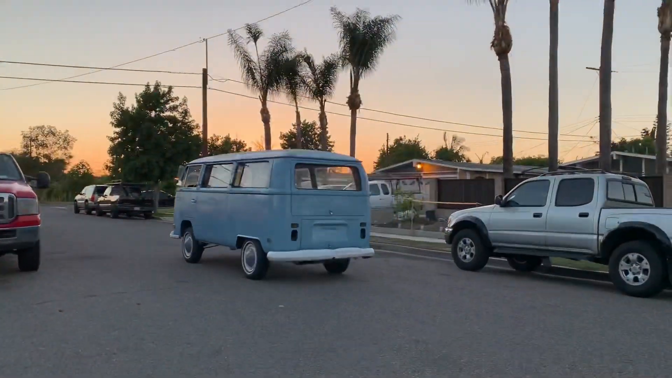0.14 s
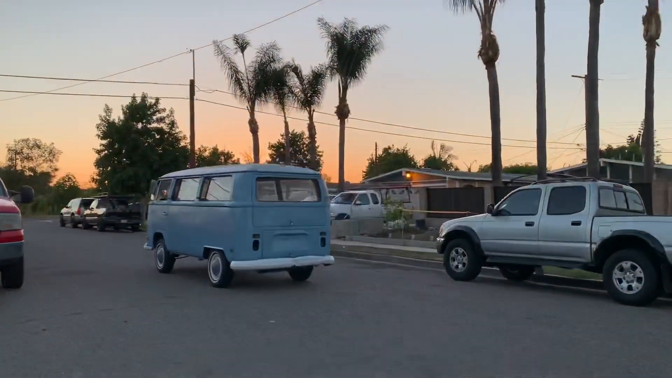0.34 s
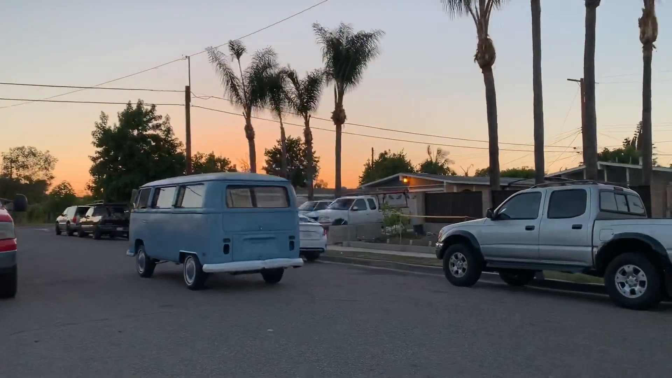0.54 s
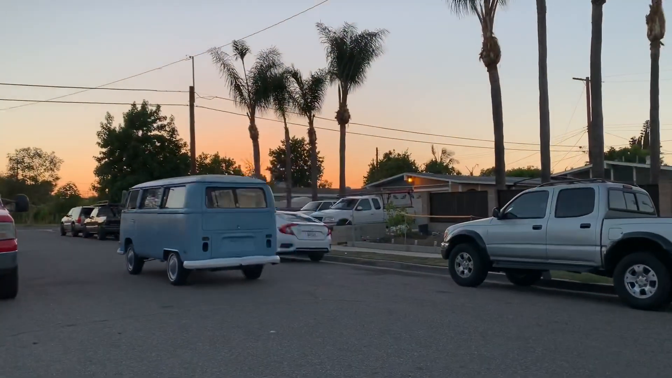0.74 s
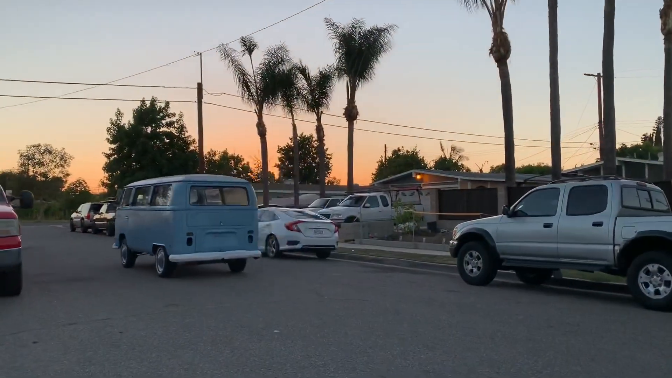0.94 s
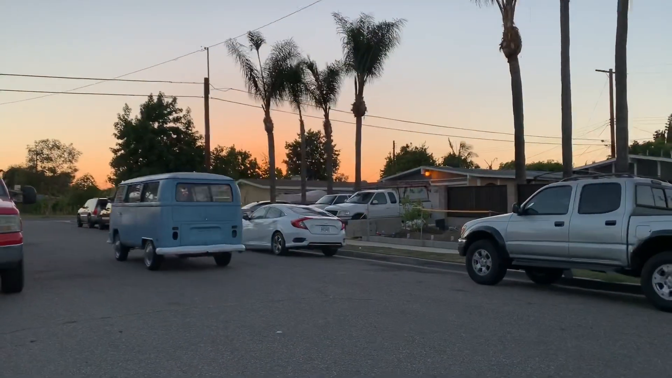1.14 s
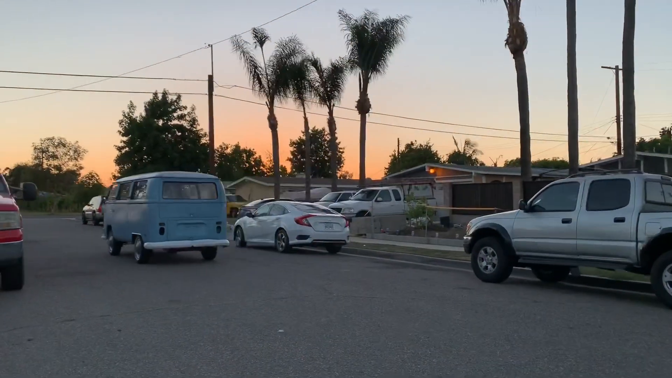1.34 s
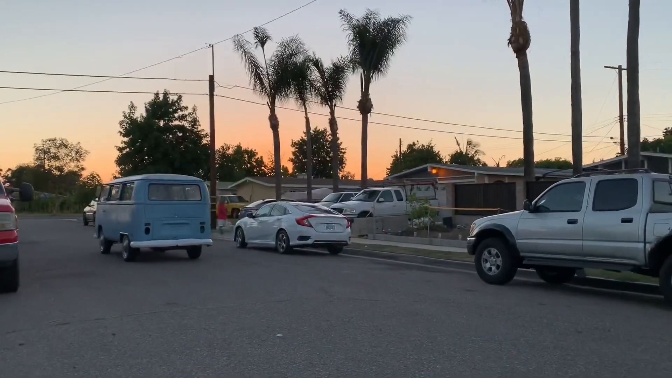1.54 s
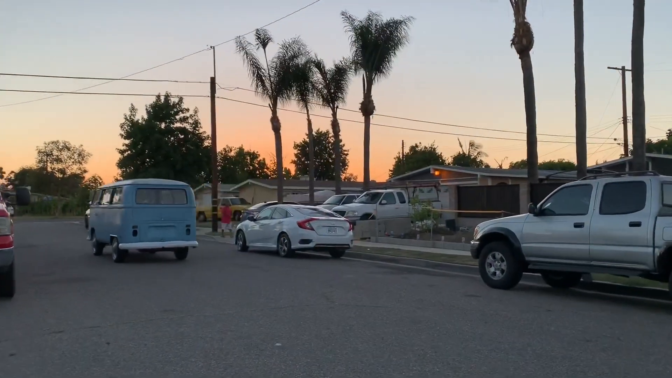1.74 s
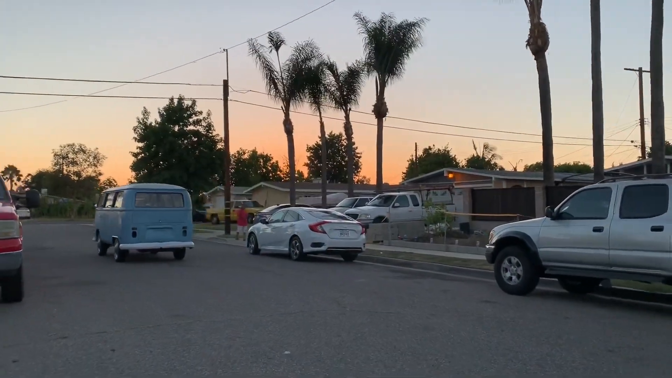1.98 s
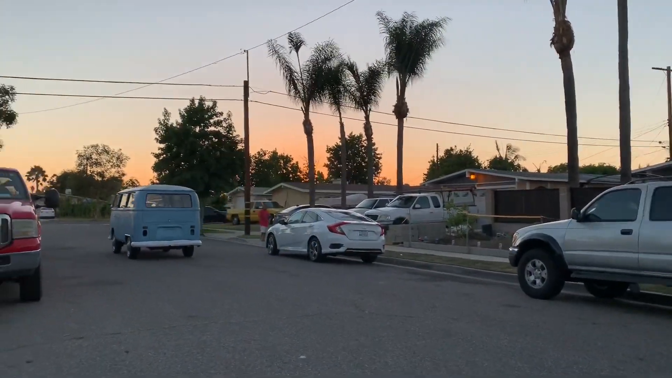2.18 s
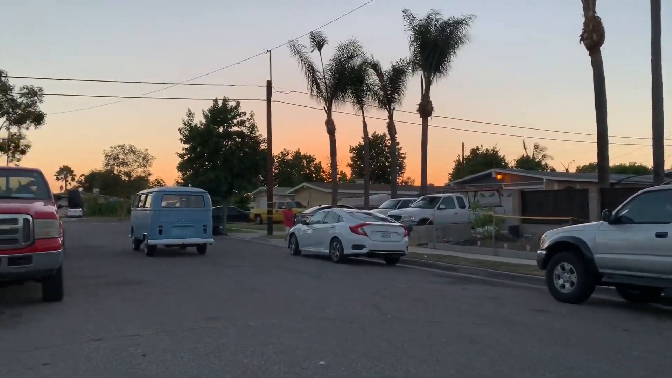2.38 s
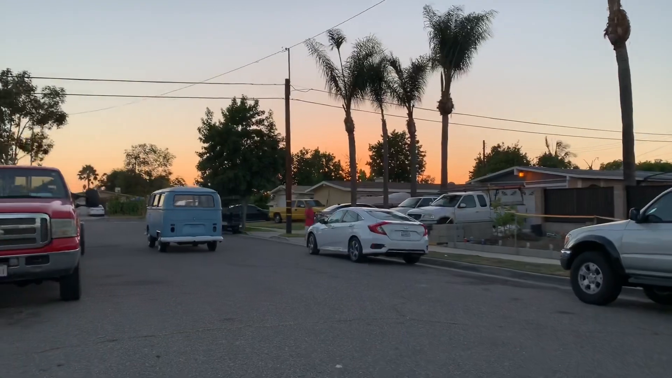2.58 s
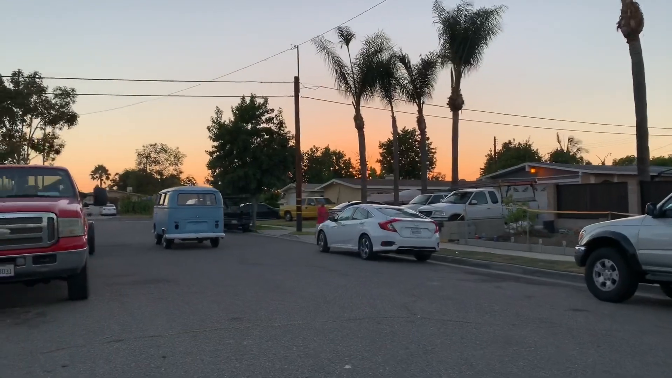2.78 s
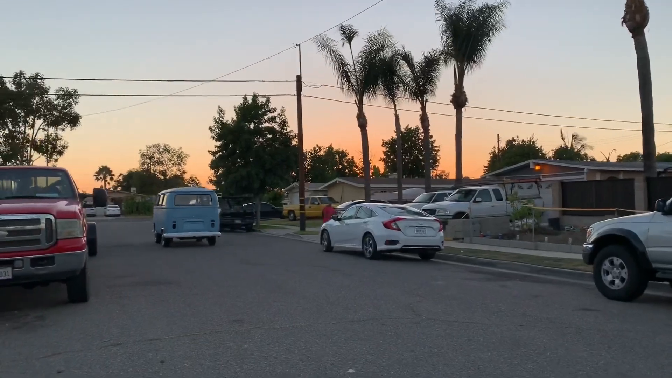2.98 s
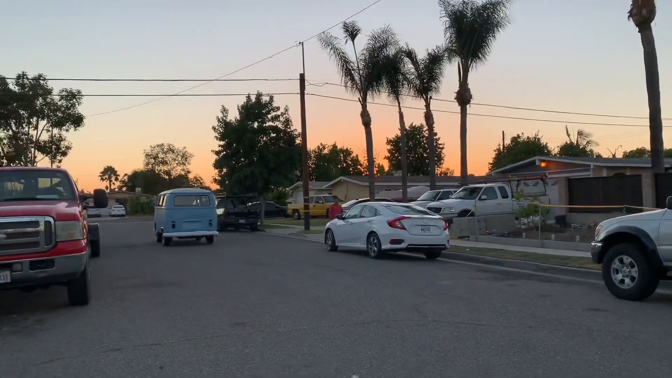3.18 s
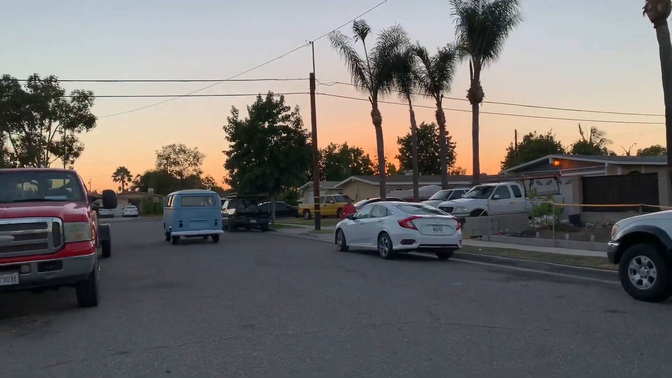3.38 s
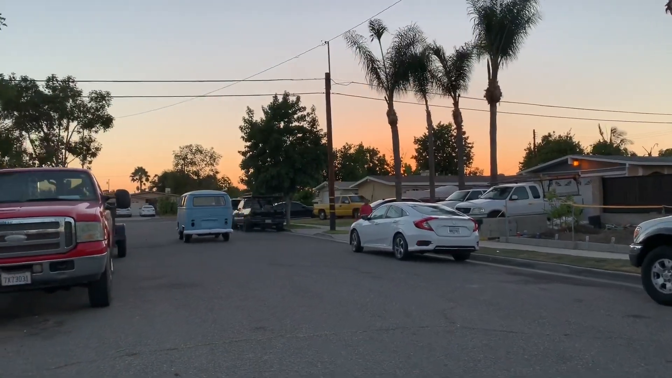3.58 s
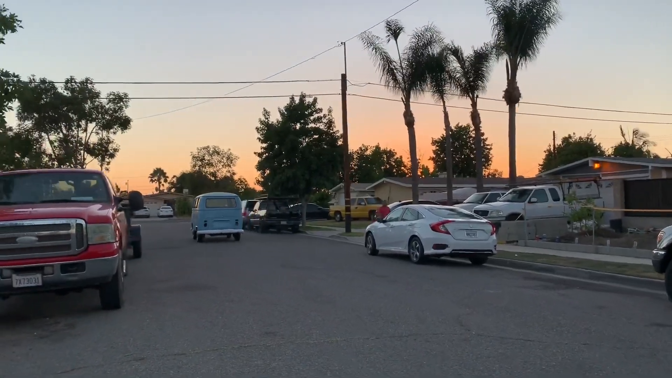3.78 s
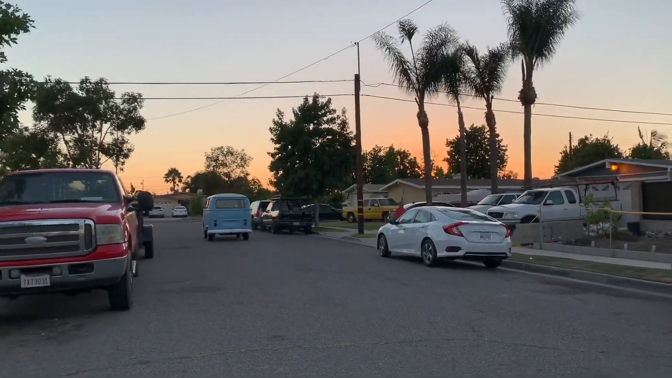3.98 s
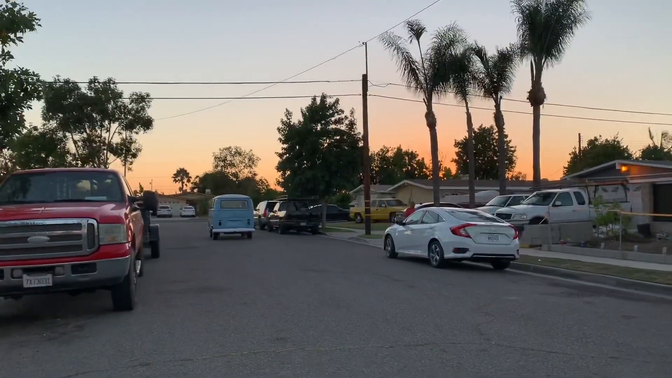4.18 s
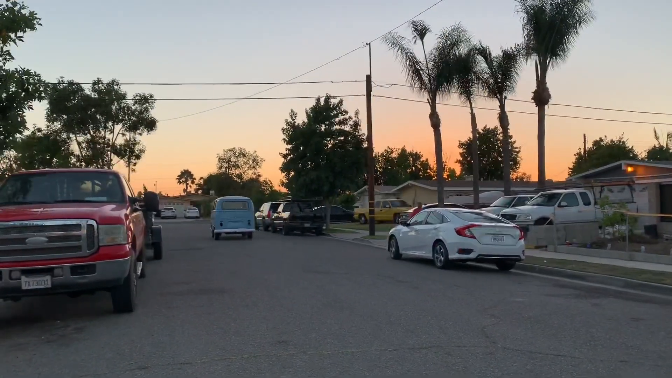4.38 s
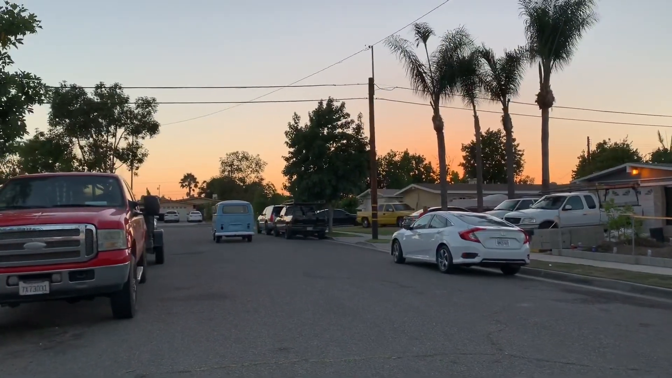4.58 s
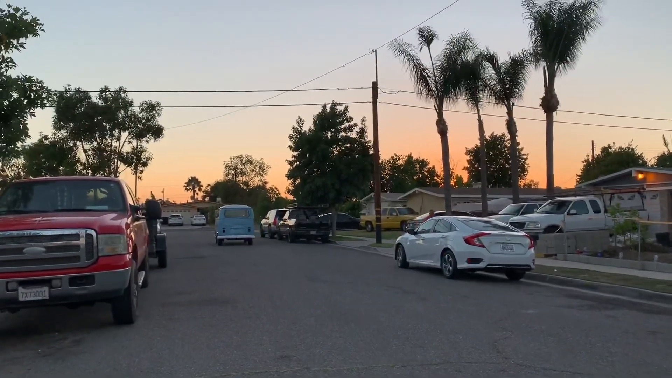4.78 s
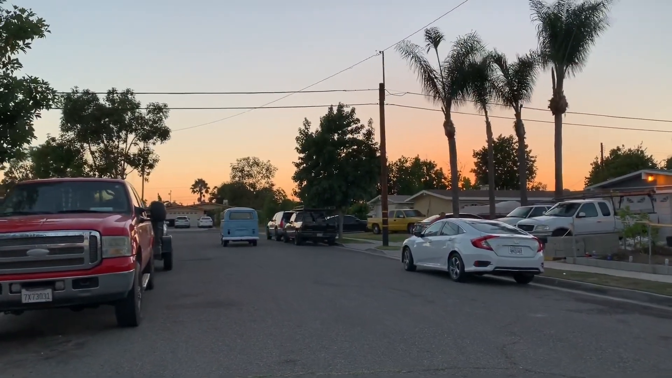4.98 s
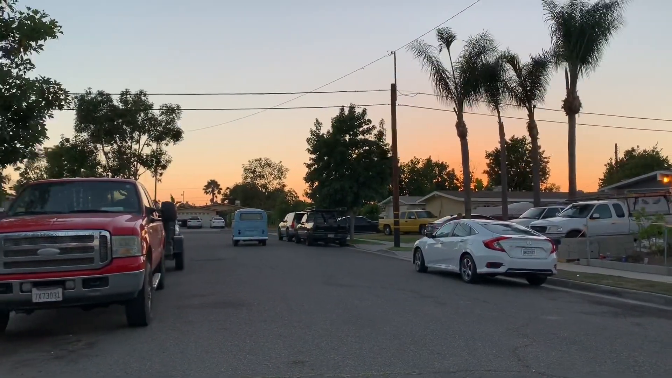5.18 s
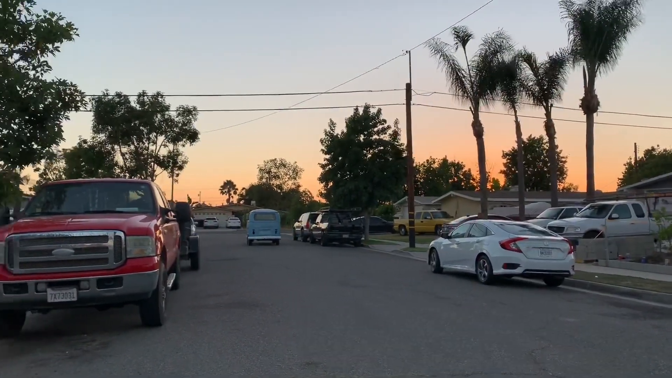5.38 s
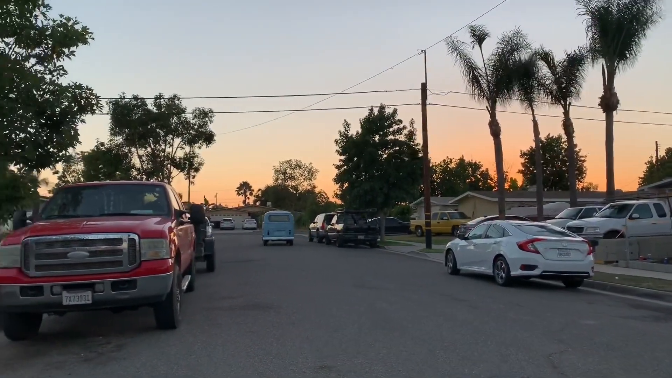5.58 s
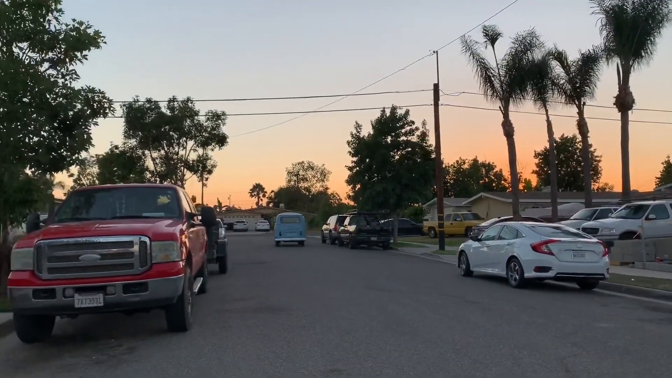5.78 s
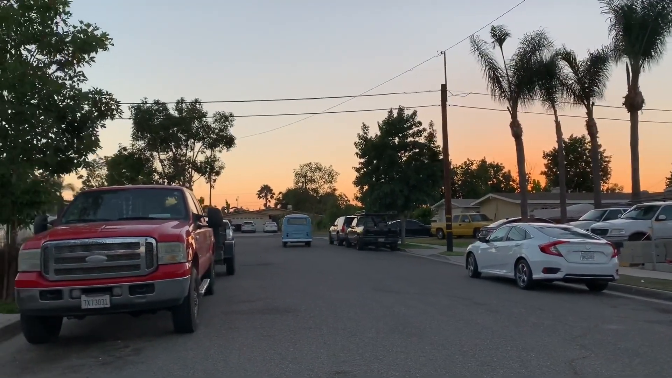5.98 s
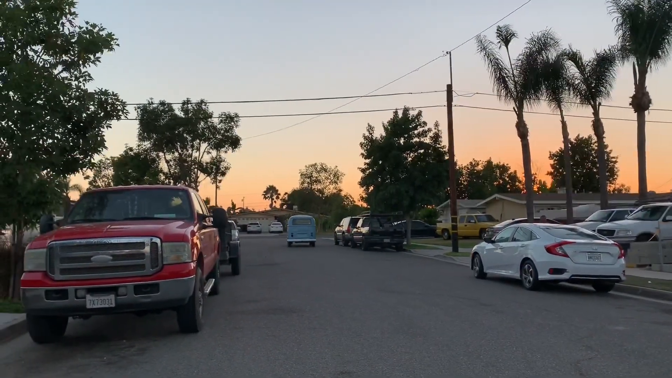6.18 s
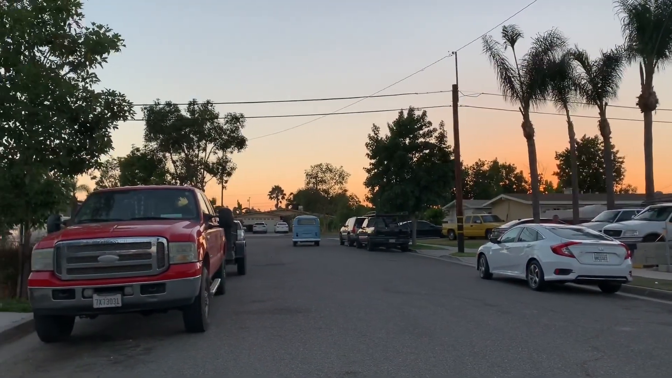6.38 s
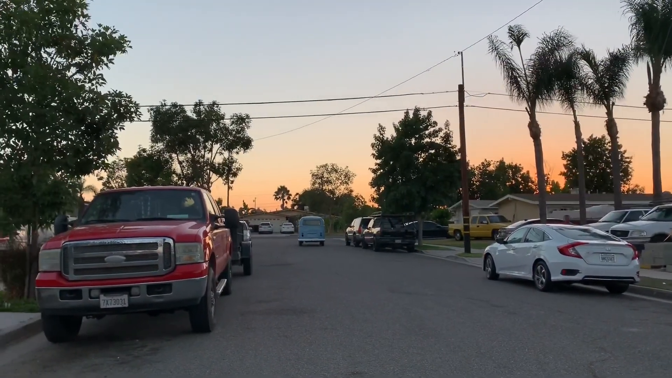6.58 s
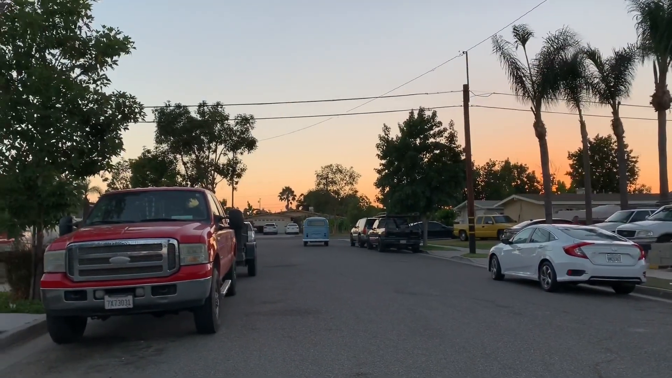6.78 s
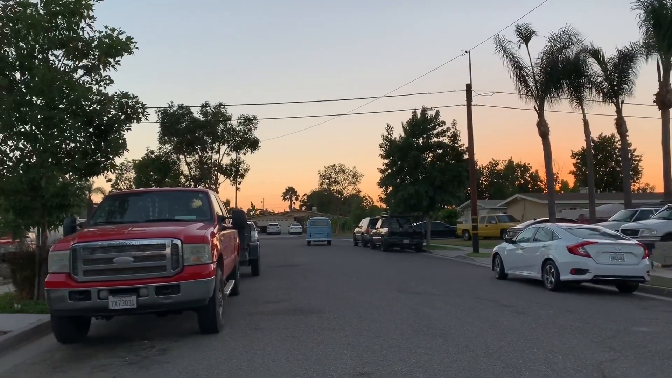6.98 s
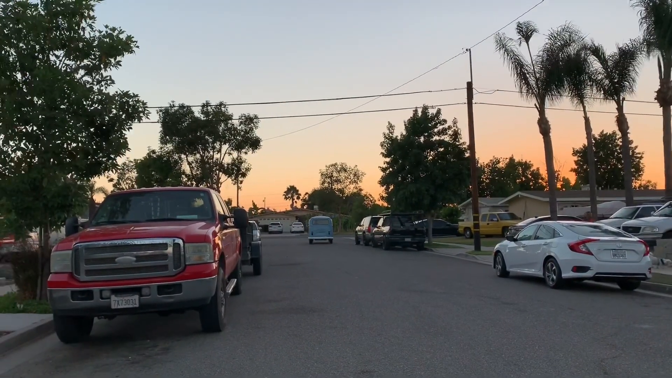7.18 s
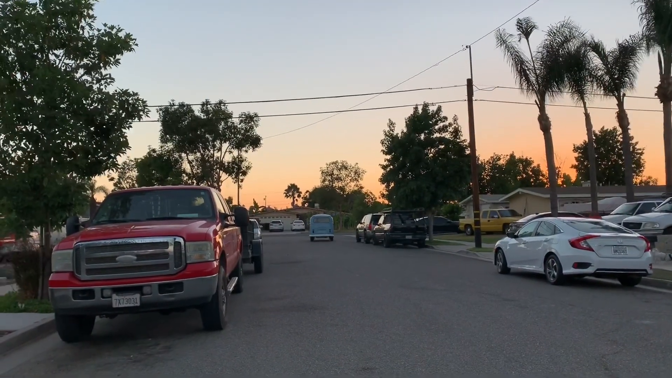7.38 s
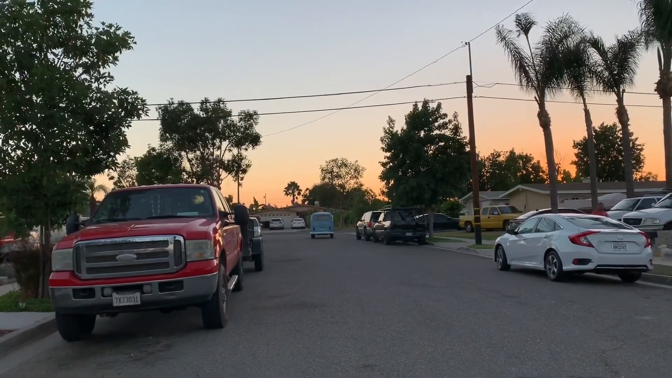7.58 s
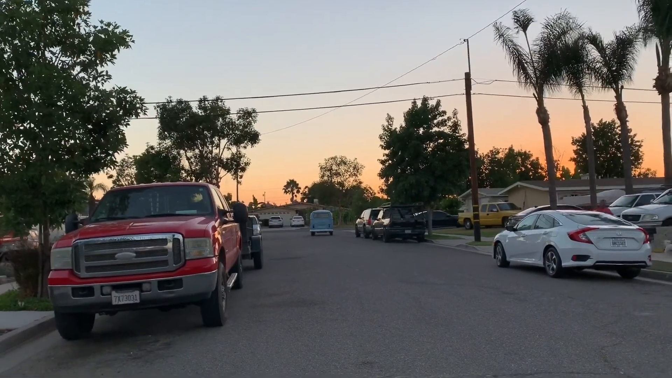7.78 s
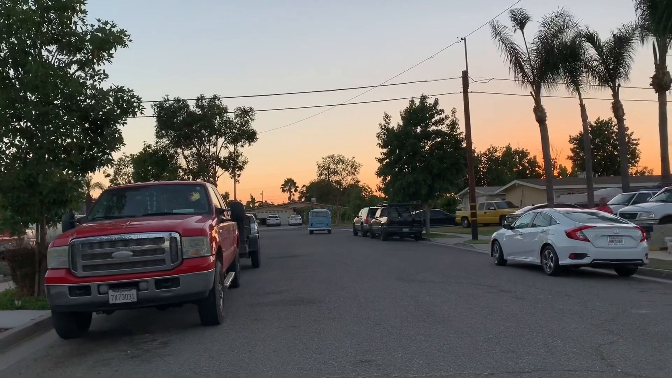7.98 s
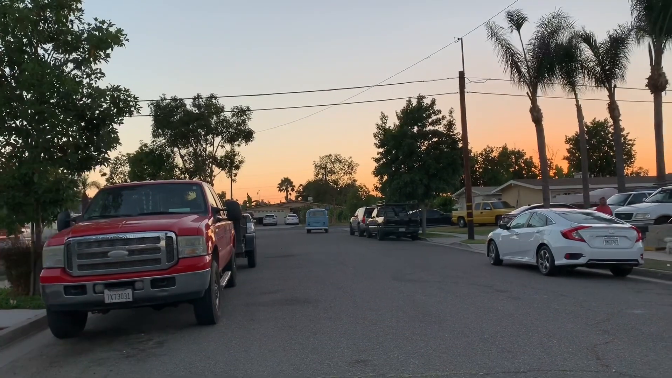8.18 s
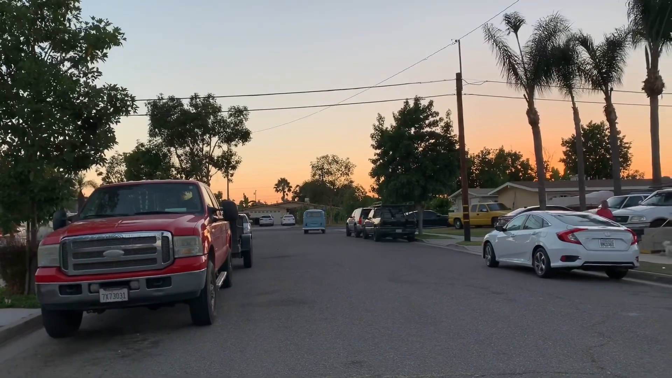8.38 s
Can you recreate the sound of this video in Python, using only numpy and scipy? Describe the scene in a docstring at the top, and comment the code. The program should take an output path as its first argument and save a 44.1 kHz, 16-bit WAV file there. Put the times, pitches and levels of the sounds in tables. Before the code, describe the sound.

Throaty, spitting exhaust blips beside the listener, drops to a low uneven chug, catches again and drives off into the distance over faint neighbourhood rumble.

```python
"""A throaty engine revs, sinks into a lug as the clutch bites, then drives off down a quiet street.
It is an old van's air-cooled flat-four: four uneven firings a cycle throb in the exhaust pipe,
rasp in the silencer, shake its shell and hiss, spit and ping at the tailpipes.
Cooling air and tyres are noise pulsing with the firings; the street is a low noise rumble.
House fronts scatter the sound back, and a phone hears it through two microphone ports."""
import sys
import numpy as np
from scipy import signal
from scipy.fft import rfft, irfft, next_fast_len
from scipy.io import wavfile
from scipy.ndimage import uniform_filter1d, map_coordinates

SR = 44100
rng = np.random.default_rng(int(sys.argv[2]) if len(sys.argv) > 2 else 0)


def generate_wav(sig):
    """Save sig (samples, or channels by samples) to the path in sys.argv[1] as 16-bit PCM at SR."""
    pcm = np.round(np.clip(np.atleast_2d(sig).T, -1, 1) * 32767).astype(np.int16)
    wavfile.write(sys.argv[1], SR, pcm)


N = 372204  # samples

# Engine speed. Each row: time in seconds, four-stroke cycles per second.
ENGINE_SPEED = [(0.0, 16.33), (0.18, 19.55), (0.3, 21.23), (0.49, 19.57), (0.67, 22.7), (0.9, 22.71),
                (1.0, 23.42), (1.3, 20.7), (1.42, 20.51), (1.82, 19.41), (2.02, 15.95), (2.2, 12.62),
                (2.39, 13.86), (2.85, 13.2), (3.1, 15.06), (3.2, 13.67), (3.7, 15.0), (4.42, 15.34),
                (5.03, 17.29), (5.93, 17.48), (7.4, 16.31), (8.44, 16.02)]
# Cylinders in firing order. Each row: place in the cycle 0-1, mean strength in dB.
CYLINDERS = [(.01, -2), (0.251, 1), (0.488, -5), (0.741, 0)]
# Barks in the silencer. Each row: start in seconds, level in dB before the underside colour, pitch in Hz.
BARKS = [(.115, -11, 880), (.155, -20, 690), (.204, -13.5, 750), (.254, -22.5, 756), (.313, -12, 870),
         (.361, -14, 840), (.373, -21, 720), (.412, -25, 895), (.461, -16, 865), (.548, -24, 730),
         (.596, -24, 780), (.654, -17, 900), (.74, -20, 855), (.752, -16, 860), (.917, -17, 920),
         (2.696, -41, 835), (3.6, -33, 1280), (3.756, -29, 795), (3.875, -30, 1100), (3.942, -30, 1300),
         (4.005, -27, 1220), (4.17, -29, 1250), (4.225, -31, 597)]
# Sharp spits at the tailpipes. Each row: start in seconds, level in dB, pitch in Hz.
SPITS = [(.0135, -15, 11100), (.0705, -16, 10900), (.116, -16, 11000), (.1265, -11, 11500),
         (.154, -24, 9050), (.1775, -12, 10900), (.2885, -19, 9000), (.5102, -16.5, 11000),
         (.5825, -24, 11000), (.5938, -28, 11500), (.6287, -17.5, 5300), (2.238, -39, 5000),
         (2.295, -33, 12000), (2.317, -39, 5540), (2.353, -36, 7360), (2.3865, -40, 5160),
         (2.4226, -31, 7500), (2.438, -38, 8750), (2.457, -36, 5300), (2.4924, -31, 7460),
         (2.53, -37, 5800), (2.5837, -39, 8000), (2.5094, -41, 12000), (3.0232, -36, 7800),
         (3.238, -38, 13000), (3.3086, -35, 8000), (3.9401, -34, 8000), (4.1726, -38, 7500),
         (5.106, -39, 2900), (5.11, -46, 7040)]
# Metallic pings of the tailpipes. Each row: start in seconds, level in dB.
PINGS = [(0.0153, -19), (0.028, -5), (0.041, -21), (.0702, -32), (0.0867, -7.5), (0.1, -9.5), (0.139, -9.5),
         (.154, -19), (0.19, -11), (0.239, -20), (.2518, -17), (.265, -33), (0.275, -15), (.2885, -20),
         (.3356, -13), (3.121, -34), (3.152, -36)]
# Ringing of a ping. Each row: mean frequency in Hz, mean level in dB, time to fall 60 dB in seconds.
TIP_MODES = [(3650, -3, .013), (4230, -1, .015), (4650, 0, .015), (5400, -6, .011)]
# Resonances of the tailpipe tips. Each row: frequency in Hz, width in Hz, relative level in dB.
TIP_RESONANCES = [(3360, 220, 25), (3470, 180, -10), (4120, 220, -8), (5060, 1200, 3)]
# Resonances of the exhaust pipe. Each row: frequency in Hz, width in Hz, relative level in dB.
PIPE_RESONANCES = [(53.6, 60, -0.5), (73.6, 11.6, -9), (142, 61, -3), (237, 38, -8)]
# Resonances of the silencer's shell. Each row: frequency in Hz, width in Hz, relative level in dB.
SHELL_RESONANCES = [(576, 55, 6.5), (1287, 140, -5.5), (1950, 1400, -17), (2340, 90, -7.5)]
# Spectrum of the silencer's rasp. Each row: frequency in Hz, relative level in dB per Hz.
RASP_SPECTRUM = [(200, -39.5), (340, 3.5), (420, -3), (480, -1), (570, 0.5), (720, 3), (900, 0.5),
                 (1000, -10.5), (1300, -18.5), (1600, -12.5), (2000, -22), (3000, -15.5), (6000, -64.5)]
# Spectrum of the tailpipe hiss close by. Each row: frequency in Hz, relative level in dB per Hz.
NEAR_HISS_SPECTRUM = [(1000, -40), (2000, -9), (3000, -7), (4500, -5), (6000, -5), (8000, 0), (10000, -4),
                      (11800, -2), (15500, -6)]
# Spectrum of the hiss far off. Each row: frequency in Hz, relative level in dB per Hz.
FAR_HISS_SPECTRUM = [(2000, -16), (3500, -21), (5400, 6), (6600, 2), (8500, 3), (10000, -6.5),
                     (12000, -0.5), (15500, -42)]
# Spectrum of cooling air and tyres. Each row: frequency in Hz, relative level in dB per Hz.
RUSH_SPECTRUM = [(200, -3.5), (560, -2), (790, -6), (1000, 0), (1250, -1), (1500, -11), (2400, -6.5),
                 (2900, -21.5), (4300, -15), (5400, -21), (6600, -23), (9000, -27), (15000, -58)]
# Spectrum of the neighbourhood rumble. Each row: frequency in Hz, relative level in dB per Hz.
STREET_SPECTRUM = [(15, -6), (30, 6), (50, -26), (100, -7), (250, 0), (500, -24), (2000, -55), (15000, -55)]
# Silencer colour on the beat at every speed. Each row: frequency in Hz, relative level in dB.
SILENCER_COLOUR = [(40, -4), (58, 1.5), (85, 1.5), (112, -8.5), (140, 0), (160, 4.5), (185, -1), (212, -4),
                   (245, -1), (275, -1), (305, -12.5), (355, -13.5), (430, -18)]
# Phase between the ports. Each row: frequency in Hz, radians by which left leads.
PORT_LEAD = [(150, .11), (300, .14), (1380, .3), (1900, .8), (2700, 1.6), (4570, 1.8), (5500, 3),
             (8180, -.6), (9850, -3.14), (11600, -6.28), (13500, -9.4), (15000, -12.4)]
# Likeness of the ports. Each row: frequency in Hz, likeness 0-1.
PORT_LIKENESS = [(100, .995), (300, .99), (640, .94), (1400, .76), (2500, .48), (5000, .56), (9000, .76),
                 (15000, .7)]
# Balance of the ports. Each row: frequency in Hz, left minus right in dB.
PORT_BALANCE = [(60, -1), (150, -1), (400, -1), (1000, 1.5), (2000, 2.5), (4000, -3.5), (8000, -1.5)]
# Echo off the houses. Each row: frequency in Hz, time to fall 60 dB in seconds.
HOUSE_DECAY = [(100, 0.5), (1000, 0.22), (10000, 0.19)]

# Exhaust beat in each way of running. Each row: order of the engine cycle, relative level in dB.
REVVING = [(3, -19), (4, -5.5), (5, -11), (6, -14.5), (7, -4), (8, -1.5), (9, -6), (10, -7), (11, -6),
           (12, -9.5), (13, -6.5), (14, -7.5), (15, -5), (16, -20), (17, -12), (18, -14), (19, -7),
           (20, -11)]
OVERRUN = [(3, -6.5), (4, 0.5), (5, -9), (6, -4), (7, -4), (8, -1), (9, -1.0), (10, -5.5), (11, -12.5),
           (12, -9.5), (13, -3.5), (14, -2.5), (15, -2), (16, -12), (17, -4.5), (18, -5), (19, -12.5),
           (20, -5.5)]
LUGGING = [(3, -18), (4, 1), (5, -3.5), (6, -9.0), (7, -11.0), (8, -5), (9, 3), (10, -12), (11, -7.5),
           (12, -1), (13, -15), (14, -11), (15, -10), (16, -4.5), (17, -20.5), (18, -5.5), (19, -7.5),
           (20, -18.5)]
CATCHING = [(3, -7.0), (4, -0.5), (5, -12), (6, -10), (7, -17), (8, -10.5), (9, 5.5), (10, -3.5), (11, -4),
            (12, -13.5), (13, 0), (14, -15), (15, -6), (16, -11.5), (17, -9), (18, -5.5), (19, -14),
            (20, -10)]
DRIVING = [(3, -3), (4, 2.5), (5, -15), (6, -10), (7, -8.5), (8, 1), (9, -4), (10, -21), (11, 1), (12, -12),
           (13, -1.5), (14, 0.5), (15, 0), (16, -7.5), (17, -6.5), (18, -2.5), (19, -4.5), (21, -5)]
CRUISING = [(3, -8.5), (4, -2.5), (5, -12.5), (6, -12), (7, -13), (8, -5), (9, -0.5), (10, -12.5), (11, -3),
            (12, -7.5), (13, -4), (14, -9.5), (15, 2), (16, -10), (17, -6), (18, -10.5), (19, -7.0),
            (20, -8.5)]
LIFTING = [(3, -6), (4, 1), (5, -1.5), (6, -5.5), (7, -9.5), (8, -10), (9, -1.5), (10, -13), (11, -8),
           (12, -20), (13, -9), (14, -20), (15, -9), (16, -26), (17, -17), (18, -22), (19, -17.0),
           (20, -24)]
PULLING = [(3, -10), (4, 3.5), (5, -5.5), (6, -9.0), (7, 0), (8, 1), (9, 2), (10, -3.5), (11, -10.5),
           (12, -4.5), (13, -11), (14, -4.5), (15, -3), (16, -5), (17, -15), (18, -6.5), (19, -11),
           (20, -12.5)]
# The low, thin beat of a stumble, strongest at the firing rate, in the same columns:
# order of the engine cycle, relative level in dB.
STUMBLING = [(2, 1), (3, -8.5), (4, 5), (5, 0), (7, -22.5), (8, -1.5), (10, -9.5), (12, -10.5), (15, -11.5),
             (21, -14.5)]
# The beat as the engine first picks up speed, in the same columns:
# order of the engine cycle, relative level in dB.
PICKING_UP = [(3, -20), (4, -1), (5, -8.0), (6, -5.5), (7, -1.5), (8, 1), (9, -11.5), (10, 0), (11, -3.5),
              (12, -2.5), (13, -5), (14, -18), (15, -24), (16, 1), (17, -5), (18, -13), (19, 0.0), (20, -5)]
# Ways of running, by name. Each entry: beat table, smear of the thump as the delay of order 20 in cycles,
# cycles by which the thump comes early, ragged share of the throb 0-1, spitting share of the hiss 0-1.
BEATS = {"stumbling": (STUMBLING, 1.0, .1, .15, .4), "picking up": (PICKING_UP, -1.0, .74, .025, .6),
         "racing": (REVVING, 1.2, .64, .02, .8), "lifting off": (LIFTING, 1.4, .22, .15, .25),
         "overrun": (OVERRUN, -1.0, .66, .03, .12), "lugging": (LUGGING, 1.4, .68, .25, .55),
         "pulling": (PULLING, 2.4, .36, .3, .4), "catching": (CATCHING, -1.0, .38, .25, .38),
         "driving": (DRIVING, -.2, .74, .04, .35), "cruising": (CRUISING, -.6, .48, .04, .1)}
# Stages of pulling away. Each row: way of running, start in seconds, blend in seconds,
# then trims in dB for throb, rasp, hiss and blare.
DRIVE_STAGES = [("stumbling", -.2, .1, -1, 0, -1.9, -6), ("picking up", .1, 0.02, 0.79, 1, -0.24, -7),
                ("racing", 0.487, .1, 0.89, 0, 0, -10), ("lifting off", 0.96, 0.068, 0.17, -3.9, -.6, 0),
                ("overrun", 1.19, .13, 0.33, -1.2, .3, .5), ("lugging", 1.98, 0.22, 0.36, -5, 0.19, -0.3),
                ("stumbling", 2.73, .081, -0.54, -.5, -2.2, -.5),
                ("pulling", 2.88, 0.019, 1.5, -4, 0.29, -1.2), ("pulling", 3.12, .2, 0.33, -2.1, 0, 1.8),
                ("stumbling", 3.68, 0.049, -1.8, -1.9, -.45, 1.5),
                ("catching", 3.86, 0.043, 0, 0, 1.9, 3.9), ("driving", 4.52, .4, 1, -0.43, -2, -1),
                ("cruising", 6.05, .4, 0, 0.11, -2, -10.5)]
# Presses of the accelerator. Each row: down in seconds, up in seconds, depth 0-1.
PRESSES = [(-.1, 0.944, 1), (1, 1.18, 0.45), (2.138, 2.585, 0.28), (2.866, 3.44, 0.33), (3.4, 3.674, 0.44),
           (3.744, 4.205, 0.44), (4.513, 6.09, 0.18), (6.079, 6.996, 0.16)]

# Loudness laws, before trims. Each: base level in dB, dB added at full throttle,
# dB per doubling of engine speed, dB lost per doubling of distance.
THROB_LAW = (-19.5, 8, 0, 4)
RASP_LAW = (-36.5, 12, 0.5, 2)
HISS_LAW = (-46.5, 14.5, 3.5, 6.5)
FAN_LAW = (-46.5, 13.5, 5.5, -0.42)
BLARE_LAW = (-45, 18, 5.5, 3.5)
# Path away from the listener: first distance in m, first speed in m/s, acceleration in m/s2.
PATH = (8, 2.2, .6)
# Hollow colour between underside and road. Each row: frequency in Hz before the slide, gain in dB.
HOLLOW_COLOUR = [(640, 0), (830, -2), (970, -5), (1090, 2.5), (1270, 2.5), (1370, -0.5), (1500, -7.5),
                 (1740, 4.5), (1880, -2.5), (2060, -4), (2380, 0), (2650, -2.5), (3200, 0.5)]
# Slide of that colour as the van straightens out and draws away. Each row: time in seconds, frequency ratio.
HOLLOW_SLIDE = [(0, 1.143), (3.1, 1.123), (3.7, 1.07), (4.3, 0.982), (8.44, 1.01)]

START_TURN = .479  # engine cycles already turned at the start
REFERENCE_SPEED = 16  # cycles per second at which engine speed adds no loudness
PRESS_S, LIFT_S = 0.075, 0.12  # opening ramp and closing time constant of the throttle, seconds
DULL_PER_DOUBLING, BRIGHT_PER_THROTTLE = 0.7, 0.91  # far share of the hiss: distance adds, throttle takes
WHISTLE_DB, WHISTLE_FADE_DB_PER_S = -28.5, 17
SWAY_CYCLES = .0086  # timing sway of the beat, multiplied by its ragged share
WAVER_DB = .8  # rms waver of each band once the distance has doubled
TOP_HZ = 16000  # band limit of the phone


def amp(db):
    """Decibels to linear gain."""
    return 10 ** (np.asarray(db) / 20)


def unit(x):
    """Bring x to rms 1."""
    return x / np.sqrt(np.mean(x ** 2) + 1e-20)


def steady(x):
    """Hold x near rms 1 over every few engine cycles."""
    power = uniform_filter1d(uniform_filter1d(x ** 2, size=SR // 8), size=SR // 8)
    return x / np.sqrt(np.abs(power) + 1e-20)


def along(points, hz):
    """Read (Hz, value) points on a log frequency axis."""
    f, v = np.transpose(points)
    return np.interp(np.log(hz + 1), np.log(f + 1), v)


def wobble(rate):
    """A smooth random curve with rate knots a second."""
    return map_coordinates(rng.standard_normal(N // 100), [np.arange(N) * rate / SR])


def noise():
    """White noise."""
    return rng.standard_normal(N)


def filtered(x, response):
    """Shape x by a complex response of frequency."""
    m = next_fast_len(N + SR // 2)
    return irfft(rfft(x, m) * response(np.fft.rfftfreq(m, 1 / SR)), m)[..., :N]


def minimum_phase(gains):
    """The causal response that has these gains from 0 Hz upward."""
    cepstrum = irfft(np.log(gains))
    n = np.arange(len(cepstrum))
    fold = 1 + np.sign(len(n) // 2 - n) * (n > 0)  # moves the later half onto the earlier
    return np.exp(rfft(cepstrum * fold))


def coloured(x, spectrum):
    """Pass x through a causal filter with the given spectrum."""
    hz = np.fft.rfftfreq(8192, 1 / SR)
    impulse = irfft(minimum_phase(amp(along(spectrum, hz))))
    return signal.fftconvolve(x, impulse)[:N]


def rung(x, modes):
    """Let x ring a set of resonances side by side."""
    def response(f):
        return sum(amp(db) * 1j * f * width / (centre * centre - f * f + 1j * f * width)
                   for centre, width, db in modes)
    return filtered(x, response)


def band(x, lo_hz, hi_hz, order):
    """Causal band-pass."""
    return signal.sosfilt(signal.butter(order, [lo_hz, hi_hz], "band", fs=SR, output="sos"), x)


def kicks(times, sizes):
    """Impulses of the given sizes."""
    at = np.clip(np.round(times * SR).astype(int), 0, N)
    return np.bincount(at, sizes, N + 1)[:N]


def puffs(pulses, life):
    """Each impulse becomes a swell that peaks after life seconds and dies away."""
    u = np.arange(SR // 8) / SR / life
    return np.abs(signal.fftconvolve(pulses, u * np.exp(1 - u))[:N])


def engine_speed():
    """Four-stroke cycles per second at every sample."""
    return np.interp(np.arange(N) / SR, *np.transpose(ENGINE_SPEED))


def turns():
    """Engine cycles completed at each sample."""
    return START_TURN + np.cumsum(engine_speed()) / SR


def firings(scatter_db):
    """Time and size of every firing, placed unevenly through each engine cycle."""
    place, db = np.transpose(CYLINDERS)
    turn = turns()
    cycles = np.arange(int(turn[-1]) + 1)
    at = np.searchsorted(turn, (cycles[:, None] + place).ravel())
    sizes = amp(np.tile(db, len(cycles)) + scatter_db * rng.standard_normal(len(at)))
    heard = (at > 0) & (at < N)
    return at[heard] / SR, sizes[heard]


def throttle():
    """How far the throttle is open, 0-1: each press rises, holds and dies away."""
    t = np.arange(N) / SR
    presses = []
    for down, up, depth in PRESSES:
        opening = np.clip((t - down) / PRESS_S, 0, 1)
        closing = np.exp(-np.maximum(t - up, 0) / LIFT_S)
        presses.append(depth * opening * closing)
    return np.max(presses, axis=0)


def doublings():
    """How often the distance has doubled as the van gathers pace."""
    start_m, speed, acceleration = PATH
    t = np.arange(N) / SR
    return np.log2(1 + (speed * t + acceleration * t ** 2 / 2) / start_m)


def level_db(law):
    """A layer follows throttle, engine speed and distance by its loudness law."""
    base_db, throttle_db, speed_db, distance_db = law
    engine_db = throttle_db * throttle() + speed_db * np.log2(engine_speed() / REFERENCE_SPEED)
    return base_db + engine_db - distance_db * doublings()


def stage_shares():
    """Share of each stage at every sample: each blends in as the one before blends out."""
    t = np.arange(N) / SR
    begun = np.array([np.clip((t - start) / blend, 0, 1) for _, start, blend, *_ in DRIVE_STAGES])
    return -np.diff(begun, axis=0, append=0)


def combustion():
    """Ragged share, spit share and the dB trims of throb, rasp, hiss and blare at every sample."""
    settings = [(*BEATS[way][-2:], *trims_db) for way, _, _, *trims_db in DRIVE_STAGES]
    return np.transpose(settings) @ stage_shares()


def street():
    """Low rumble of the neighbourhood: dark noise with a slowly wandering level."""
    return amp(-40 + 2 * wobble(4)) * unit(coloured(noise(), STREET_SPECTRUM))


def houses(x):
    """House fronts and parked cars scatter the sound into a tail whose treble dies sooner."""
    hz, t, z = signal.stft(rng.standard_normal(SR // 2), SR, nperseg=256)
    decay = amp(-60 * t / along(HOUSE_DECAY, hz)[:, None])
    tail = signal.istft(z * decay, SR, nperseg=256)[1]
    return signal.fftconvolve(x, tail / np.linalg.norm(tail))[:N]


def fan(times, sizes):
    """Cooling air and tyres rush, with mechanical clatter in step with the firings."""
    clatter = 1 + 0.95 * steady(puffs(kicks(times, sizes), life=0.0099))
    rush = unit(coloured(noise() * clatter, RUSH_SPECTRUM))
    return amp(level_db(FAN_LAW) + 0.2 * wobble(9.8)) * rush


def bursts(events, cycles, width, order):
    """Single harder puffs of gas: each rings in a band around its pitch and peaks after a few cycles."""
    t = np.arange(SR // 16) / SR
    out = np.zeros(N + len(t))
    for start, db, hz in events:
        u = t * hz / cycles
        top_hz = min(hz * (1 + width), SR / 2 - 1)
        ring = unit(band(rng.standard_normal(len(t)), hz / (1 + width), top_hz, order=order))
        out[round(start * SR):][:len(t)] += amp(db) * u * np.exp(1 - u) * ring
    return out[:N]


def pings():
    """Hard puffs crack against the steel tips, which ring for a moment."""
    t = np.arange(SR // 16) / SR
    out = np.zeros(N + len(t))
    for start, db in PINGS:
        ring = np.zeros(len(t))
        for hz, mode_db, t60 in TIP_MODES:
            louder, sharper = rng.standard_normal(2)  # no two pings ring quite alike
            tone = np.sin(2 * np.pi * hz * (1 + 0.028 * sharper) * t)
            ring += amp(mode_db + 2 * louder - 60 * t / t60) * tone
        crack = band(rng.standard_normal(len(t)), 2400, 9500, order=2) * amp(-1 - 60 * t / 0.011)
        onset = 1 - np.exp(-t / 0.00099)
        out[round(start * SR):][:len(t)] += amp(db) * onset * (ring + crack)
    return out[:N]


def tailpipes(times, sizes):
    """Each firing spits noise through the narrow tips, with a tip whistle that fades from the start."""
    _, spit_share, _, _, hiss_db, _ = combustion()
    spit_share = np.clip(spit_share, 0, 1)
    far = np.clip(DULL_PER_DOUBLING * doublings() - BRIGHT_PER_THROTTLE * throttle(), 0, 1)
    strength = sizes ** .3 * amp(3 * rng.standard_normal(len(times)))  # evens out the cylinders
    spit = steady(puffs(kicks(times, strength), life=0.0016))
    flow = np.sqrt(spit_share * spit ** 2 + 1 - spit_share)
    near_hiss = unit(coloured(noise() * flow, NEAR_HISS_SPECTRUM))
    far_hiss = unit(coloured(noise() * flow, FAR_HISS_SPECTRUM))
    hiss = np.sqrt(1 - far) * near_hiss + np.sqrt(far) * far_hiss
    whistle = unit(band(rung(noise() * spit ** 2, TIP_RESONANCES), 4130, 5800, order=2))
    whistle_db = WHISTLE_DB - WHISTLE_FADE_DB_PER_S * np.arange(N) / SR
    return amp(level_db(HISS_LAW) + hiss_db) * hiss + amp(whistle_db) * whistle


def shell(times, sizes):
    """Firings shake the silencer's steel shell: pulsing noise rings its resonances into a blare."""
    blows = noise() * (0.41 + puffs(kicks(times, sizes), life=0.0041))
    blare = steady(band(rung(blows, SHELL_RESONANCES), 476, 2480, order=3))
    blare_db = combustion()[-1]
    return amp(level_db(BLARE_LAW) + blare_db) * blare


def chambers(pulses):
    """The silencer's chambers smear each pulse; their ring drifts as the hot gas shifts."""
    t = np.arange(SR // 10) / SR
    first, second = [signal.fftconvolve(pulses, rng.standard_normal(len(t)) * amp(-60 * t / 0.035))[:N]
                     for _ in range(2)]
    drift = 1.5 * wobble(.8)  # radians, turning from one ring to the other
    return band(np.cos(drift) * first + np.sin(drift) * second, 200, 2500, order=3)


def beat(ragged, sway, flutter_db):
    """Every cycle starts with a thump and rings down; ragged running shakes its timing and size."""
    turn = turns() + sway * ragged * wobble(22)
    order = np.arange(257)
    out = np.zeros(N)
    for (way, *_), share in zip(DRIVE_STAGES, stage_shares()):
        orders, smear, early, _, _ = BEATS[way]
        # orders beyond the table fall away steeply
        db = np.interp(order, *np.transpose([(0, -45), *orders, (28, -50), (50, -100)]))
        delay = np.exp(-1j * np.pi * smear * order ** 2 / 20)
        cycle = unit(irfft(minimum_phase(amp(db)) * delay))
        out += share * np.interp(turn + early, np.arange(len(cycle)) / len(cycle), cycle, period=1)
    return steady(coloured(out, SILENCER_COLOUR)) * amp(flutter_db * ragged * wobble(30))


def exhaust(times, sizes):
    """A regular beat, stray pulses that ring the pipe, and a turbulent wake that rasps in the silencer."""
    ragged, _, throb_db, rasp_db, _, _ = combustion()
    ragged = np.clip(ragged, .01, .6)
    late, strength = rng.standard_normal((2, len(times)))
    stray = kicks(times + 0.00212 * late, np.tanh(2 * strength))
    stray = steady(band(rung(stray, PIPE_RESONANCES), 44.7, 225.5, order=3))
    regular = beat(ragged, sway=SWAY_CYCLES, flutter_db=1.5)
    throb = np.sqrt(1 - ragged) * regular + np.sqrt(ragged) * stray
    gusts = noise() * (1.5 + puffs(kicks(times, sizes), life=0.003))
    wake = steady(coloured(gusts, RASP_SPECTRUM))
    buzz = steady(coloured(chambers(kicks(times, sizes)), RASP_SPECTRUM))
    rasp = amp(-1) * (0.62 * buzz + 0.83 * wake)
    return amp(throb_db + level_db(THROB_LAW)) * throb + amp(rasp_db + level_db(RASP_LAW)) * rasp


def underside(x):
    """Reflections under the van cut sliding peaks and hollows; each band wavers on its own."""
    hz, t, z = signal.stft(x, SR, nperseg=1024)
    ratio = np.interp(t, *np.transpose(HOLLOW_SLIDE))
    field = uniform_filter1d(rng.standard_normal(z.shape), size=2, axis=0)
    field = uniform_filter1d(uniform_filter1d(field, size=18, axis=1), size=12, axis=1)
    waver_growth = np.minimum(np.interp(t, np.arange(N) / SR, doublings()), 1)
    waver_db = WAVER_DB * unit(field) * waver_growth
    colour_db = along(HOLLOW_COLOUR, hz[:, None] / ratio)
    return signal.istft(z * amp(colour_db + waver_db), SR, nperseg=1024)[1][:N]


def ports(direct, diffuse):
    """Two microphone ports hear the sound with their own phase and level, their likeness set by pitch."""
    def angle(hz):
        return np.arccos(np.clip(along(PORT_LIKENESS, hz), 0, 1)) / 2

    half = np.array([[.5], [-.5]])  # left, right

    def offset(hz):
        return amp(half * along(PORT_BALANCE, hz)) * np.exp(1j * half * along(PORT_LEAD, hz))

    mid = filtered(direct, lambda hz: np.cos(angle(hz)))
    side = filtered(diffuse, lambda hz: np.sin(angle(hz)))
    return filtered(np.array([mid + side, mid - side]), offset)


def scene():
    """The van in its street, with the echo of the houses, at the two ports."""
    times, sizes = firings(scatter_db=2.5)
    van = fan(times, sizes) + tailpipes(times, sizes) + shell(times, sizes) + exhaust(times, sizes)
    van = underside(van + bursts(BARKS, cycles=2.33, width=0.14, order=2))
    van = van + pings() + bursts(SPITS, cycles=4.5, width=.14, order=1)
    air = street() + van
    echo = houses(band(van, 176, 9100, order=2))
    return ports(air + amp(-11.0) * echo, houses(air))


def record(dry):
    """The phone rounds off the highest peaks and keeps nothing above its band limit."""
    rounded = dry / (1 + (dry / .97) ** 8) ** (1 / 8)
    return filtered(rounded, lambda hz: hz < TOP_HZ)


dry = scene()
out = record(dry)
generate_wav(out)
```